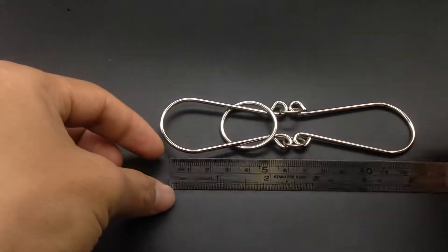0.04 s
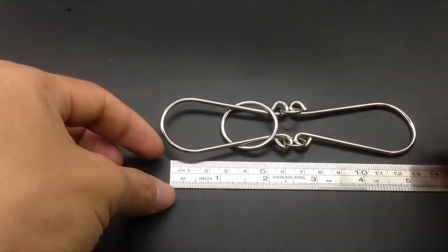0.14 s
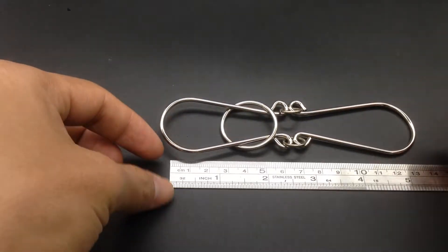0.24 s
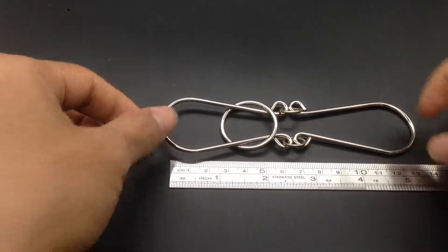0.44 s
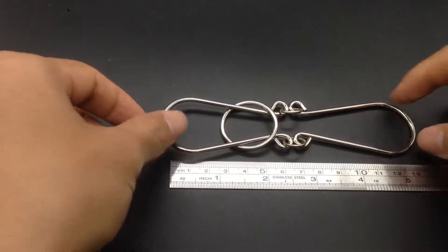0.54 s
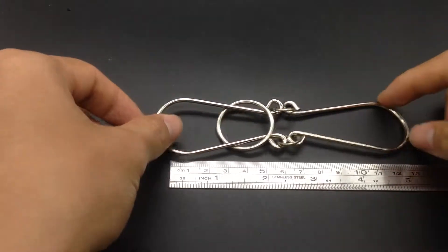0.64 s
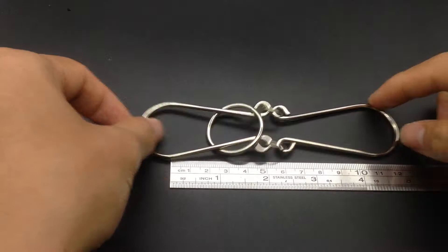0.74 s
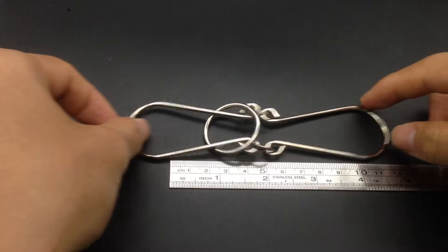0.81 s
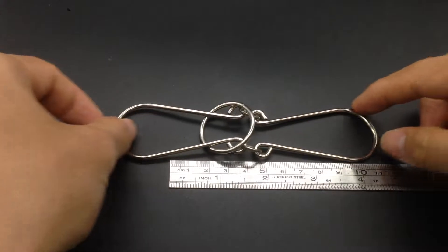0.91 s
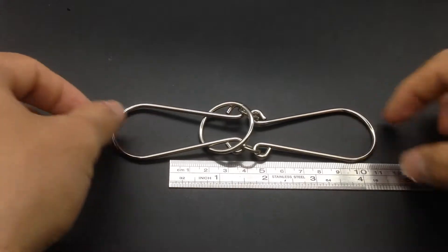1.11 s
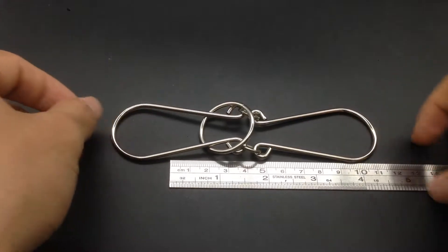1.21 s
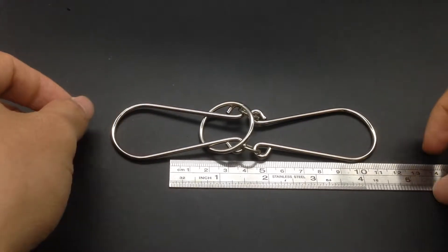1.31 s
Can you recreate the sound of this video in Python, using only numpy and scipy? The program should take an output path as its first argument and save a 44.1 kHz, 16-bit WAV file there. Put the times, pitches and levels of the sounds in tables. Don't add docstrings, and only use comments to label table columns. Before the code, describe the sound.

A metal wire puzzle clinks and chatters on a wooden table after one dull ruler knock

```python
import sys
import numpy as np
from scipy import signal
from scipy.fft import rfft, irfft
from scipy.io import wavfile
from scipy.ndimage import uniform_filter1d

SR = 44100
rng = np.random.default_rng(int(sys.argv[2]) if len(sys.argv) > 2 else 0)


def elevation(decibels):
    levels = np.asarray(decibels, float)
    return 10 ** (levels / 20)


def int16_out(signal):
    q = np.round(np.clip(np.atleast_2d(signal).T, -1, 1) * 32767)
    wavfile.write(sys.argv[1], SR, q.astype(np.int16))


N = 59535
T = np.arange(N) / SR

# frequency in Hz, density in dB per Hz.
ROOM_TONE = [(15, -68), (25, -37), (55, -10), (204, -4), (410, -13), (495, -11.5), (826, -19), (945, -19.5),
             (15500, -24)]
# time in seconds, level in dB.
HAND_LEVELS = [(0, -68), (.09, -69), (.15, -57), (.24, -49), (.3, -64.5), (.36, -71), (.62, -67.5),
               (.68, -61), (.76, -58), (.8, -59), (.9, -59), (.95, -63.5), (1.06, -66), (1.12, -65.5),
               (1.27, -69.5), (1.31, -58.5), (1.35, -60.5)]
# frequency in Hz, level in dB, decay t60 in seconds.
TABLE_MODES = [(88, -14, 0.13), (170.8, -1, 0.072), (208, -3.5, 0.18), (307.6, -10.5, 0.06),
               (404.6, -6.5, 0.053), (476, -14, 0.1), (552, -13, 0.047), (626, -17, .056),
               (854, -16.5, 0.044), (1250, -28, 0.028)]
# start in seconds, peak in dB, swing in Hz (negative: first swing down),
# number of half swings, ring-on in dB.
PUSHES = [(0.098, -53, 202, 32, -32), (0.154, -40.5, 191, 3.3, -3), (.168, -40.5, 154.5, 7.7, -17),
          (0.2059, -26.5, -100, 0.95, -42), (0.2108, -11, 189, 3.58, -22.5), (0.234, -38, 150, 5, -12),
          (0.251, -41.5, 221.5, 13.3, 1.5), (0.271, -49.5, 75, 6.3, -29), (0.298, -54, 166, 11.3, -16),
          (0.6961, -37, 99, 2.9, -10.5), (0.716, -41, -220, 1.05, -23), (0.7265, -39, -235, 6.8, 2),
          (0.852, -53, 193, 6.2, -12), (0.8894, -49, 196, 3.7, -24), (0.9135, -53.5, 164, 3.7, -13),
          (1.068, -58, 167, 6.8, -22), (1.2944, -46.5, 92, 2.04, -9.5), (1.3207, -48, 197, 6.4, -9),
          (1.3455, -42.5, -210, 1.8, -13)]
TICK_TIMES = [.1705, .2104, .2106, .2104, .2104, .388, .672, .6938, .7275, 1.0291, 1.2937, .2146, .2182,
              1.2975, 1.33, .227]
# peak in dB, centre in Hz, width in Hz, t60 in seconds.
TICKS = [(-57.5, 1300, 2700, 0.1), (-36, 3130, 2400, 0.021), (-30.5, 4460, 2850, 0.018),
         (-41.5, 1950, 730, 0.056), (-45, 7500, 9300, 0.022), (-59.5, 1360, 810, 0.043),
         (-64, 2500, 3100, 0.054), (-49, 2500, 2900, 0.1), (-39.5, 3160, 5000, 0.091),
         (-56, 3100, 1100, 0.034), (-54.5, 1260, 2700, 0.03), (-36, 3350, 3300, 0.024),
         (-43, 3900, 2200, 0.013), (-60, 1600, 2400, 0.057), (-61.5, 1700, 1700, .1),
         (-53, 3100, 2600, 0.035)]
# frequency in Hz, level in dB, t60 in seconds.
KNOCK_TONES = [(393.7, -24.5, 0.082), (478, -38.5, 0.11), (572, -43, 0.059), (625, -47, 0.078),
               (804, -45.5, 0.06), (940, -45, 0.052), (1254, -33, 0.029), (2840, -32.5, 0.028),
               (3333, -38.5, 0.027), (4090, -34, 0.022), (3770, -47.5, 0.054), (4995, -43.5, 0.017),
               (5370, -35.5, 0.033), (6140, -45, .022)]
# time in seconds, level in dB.
DRAG_LEVELS = [
    (.66, -96),
    (.68, -67),
    (.76, -90),
    (.785, -60.5),
    (.8, -61.5),
    (.85, -58.5),
    (.88, -62.5),
    (.9, -63.5),
    (.96, -69),
    (1.0, -72.5),
]
# frequency in Hz, level in dB, t60 in seconds.
WIRE_MODES = [(2676, -4, .035), (4100, -6, .035), (4899, -1, .032), (5150, -3, .03), (5529, -4, .06),
              (5819, -5, .045), (6780, -4, .06), (8750, -4, .04), (9561, -3, .045), (10030, -5, .05),
              (12520, -4, .06), (13480, -6, .06), (14310, -4, .06), (15130, -10, .05)]
CLINK_TIMES = [.6938, .7123, .7123, .7123, .7275, .7285, .738, .748, .7806, .7958, .7958, .797, .8012,
               .8085, .8233, .8233, .835, .843, .86, .876, .891, .903, .919, .7275, .733, .735, .751, .7958,
               .81, .8235, .6938, .7285, .919, .877, .8235]
# peak in dB, favoured frequency in Hz, spread in octaves,
# chatter in seconds.
CLINKS = [(-48, 2700, 0.94, .003), (-40, 4980, .2, 0.0049), (-53, 9000, 0.071, .005),
          (-44, 14300, .12, .004), (-30.5, 13300, 0.092, 0.0053), (-34.5, 4600, 0.3, 0.013),
          (-45.5, 4200, .3, 0.0035), (-48, 8300, 0.43, .005), (-51, 14400, .12, .004),
          (-41, 4800, 0.091, .0005), (-47.5, 9600, .06, 0.00082), (-44, 15000, 0.45, 0.023),
          (-42, 4700, 0.15, 0.0011), (-47.5, 2676, 0.054, 0.00089), (-44, 5000, .08, 0.00056),
          (-47.5, 14200, .03, .012), (-49, 4600, .07, 0.0047), (-57, 4850, .1, .001),
          (-52, 2630, 0.13, 0.0046), (-50, 2700, 0.12, .01), (-51, 2900, .35, 0.0038),
          (-55, 5900, .1, 0.0025), (-54, 2400, 0.39, .002), (-32.5, 9600, 0.1, 0.0063),
          (-42, 4800, .2, 0.0036), (-47, 14000, 0.43, 0.0045), (-45, 13500, .2, 0.00091),
          (-53, 14300, .1, .004), (-52, 5600, 0.22, .003), (-43.5, 10800, .35, .014),
          (-48.5, 13000, .4, 0.0044), (-44.5, 6600, 0.05, 0.0046), (-56, 14310, .04, .002),
          (-53, 12000, 0.44, .008), (-56.5, 6780, .05, .006)]


def unit(x):
    return x / np.sqrt(np.mean(x ** 2))


def ring(x, hz, t60):
    r = np.exp(-np.log(1000) / (t60 * SR))
    w = 2 * np.pi * hz / SR
    return signal.lfilter([0, r * np.sin(w)], [1, -2 * r * np.cos(w), r * r], x)


def band(x, hz, width_hz):
    low = np.hypot(hz, width_hz / 2) - width_hz / 2
    high = min(low + width_hz, SR / 2.2)
    return signal.lfilter(*signal.butter(2, [low, high], "band", fs=SR), x)


def fade(start, t60, rise=.0001):
    return np.clip((T - start) / rise, 0, 1) * np.exp(-np.log(1000) * np.abs(T - start) / t60)


def walk(rate):
    k = int(SR / rate)
    return unit(uniform_filter1d(uniform_filter1d(rng.standard_normal(N), k), k))


def levels(rows):
    return np.interp(T, *np.array(rows).T)


def table(force):
    return sum(elevation(db) * ring(force, hz, t60) for hz, db, t60 in TABLE_MODES)


def room():
    level_db = -68.5
    f = np.maximum(np.arange(N // 2 + 1) * SR / N, 1)
    hz, db = np.array(ROOM_TONE).T
    gain = elevation(np.interp(np.log(f), np.log(hz), db))
    x = irfft(rfft(rng.standard_normal(N)) * gain, N)
    return x * elevation(level_db) / np.std(band(x, 3240, 14950))


def hands():
    flicker_db = 2
    rumble = unit(table(rng.standard_normal(N)))
    return rumble * elevation(levels(HAND_LEVELS) - 1 + flicker_db * walk(54))


def pushes():
    rise_s, press_s = .0012, 0.00088
    out = np.zeros(N)
    for at, db, hz, halves, ring_db in PUSHES:
        t = T - at
        progress = np.clip(t * 2 * abs(hz) / halves, 0, 1)
        swing = np.sin(2 * np.pi * hz * t) * (1 - progress ** 4) * np.clip(t / rise_s, 0, 1) ** .5
        after = table(np.sin(np.pi * np.clip(t / press_s, 0, 1)))
        out += elevation(db) * (swing + elevation(ring_db) * after / np.abs(after).max())
    return signal.filtfilt(*signal.butter(2, 55.5, "high", fs=SR), out)


def ticks():
    rise_s, snap_db = 0.00043, -4
    tail_db, tail_t60_s = -23.5, 0.11
    out = np.zeros(N)
    for at, (db, hz, width_hz, t60) in zip(TICK_TIMES, TICKS):
        shape = fade(at, t60, rise_s)
        shape += elevation(snap_db) * fade(at, 0.013, rise_s)
        shape += elevation(tail_db) * fade(at, tail_t60_s, 0.004)
        burst = band(rng.standard_normal(N) * shape, hz, width_hz)
        out += elevation(db - 5.5) * np.sqrt(SR / 2 / width_hz) * burst
    return out


def knock():
    start_s = .2113
    blow = np.hanning(6)
    force = np.r_[np.zeros(int(start_s * SR)), blow / blow.sum(), np.zeros(N)][:N]
    return sum(elevation(db) * ring(force, hz, t60) for hz, db, t60 in KNOCK_TONES)


def drag():
    grain_db = 4
    grains = np.minimum(rng.exponential(size=N), np.log(100))
    grit = rng.standard_normal(N) * elevation(grain_db * grains)
    return unit(band(grit, 3050, 5000)) * elevation(levels(DRAG_LEVELS) + 0.75 * walk(80))


def clinks():
    rebounds_per_s, scatter_db = 2100, 2.5
    shimmer_db, shimmer_t60_s = -6, .03
    rise_s, grip_s = 0.00027, 0.031
    echo_db, echo_t60_s = -2.5, 0.038
    span = int(.2 * SR)
    t = T[:span]
    lesser = [(f, shimmer_db, shimmer_t60_s) for f in 15400 * rng.uniform(0.31, 1, size=60) ** 2]
    modes = [*WIRE_MODES, *lesser]
    out = np.zeros(N)
    for at, (db, hz, octaves, chatter) in zip(CLINK_TIMES, CLINKS):
        chance, strength = rng.standard_normal((2, span))
        hits = chance > np.quantile(chance, 1 - rebounds_per_s / SR)
        rebounds = hits * strength * fade(0, 5 * chatter)[:span] * 1.57
        rebounds[0] = 1
        sound = np.zeros(span)
        for k, (f, mode_db, t60) in enumerate(modes):
            away_db = 4.7 * (np.log2(f / hz) / octaves) ** 2
            gain = elevation(mode_db + scatter_db * strength[k] - away_db)
            sound += gain * ring(rebounds, f * (1 + 0.00067 * chance[k]), t60)
        envelope = np.minimum(t / rise_s, 1) / (1 + (t / grip_s) ** 4)
        out[int(at * SR):][:span] += elevation(db) * sound / np.abs(sound).max() * envelope
    echo = (rng.standard_normal(N) * fade(0.0056, echo_t60_s))[:span]
    echo /= np.sqrt(np.sum(echo ** 2))
    return out + elevation(echo_db) * signal.fftconvolve(out, echo)[:N]


def scene():
    return (room() + hands() + pushes() + ticks() + knock() + drag() + clinks())[None]


def low_pass(x):
    return signal.sosfilt(signal.butter(12, 15950, fs=SR, output="sos"), x)


def record(dry):
    x = signal.sosfilt(signal.butter(2, 45, "high", fs=SR, output="sos"), dry)
    x = signal.sosfilt(signal.ellip(6, .2, 20, 15230, fs=SR, output="sos"), x)
    return low_pass(x)


dry = scene()
out = record(dry)
int16_out(out)
```